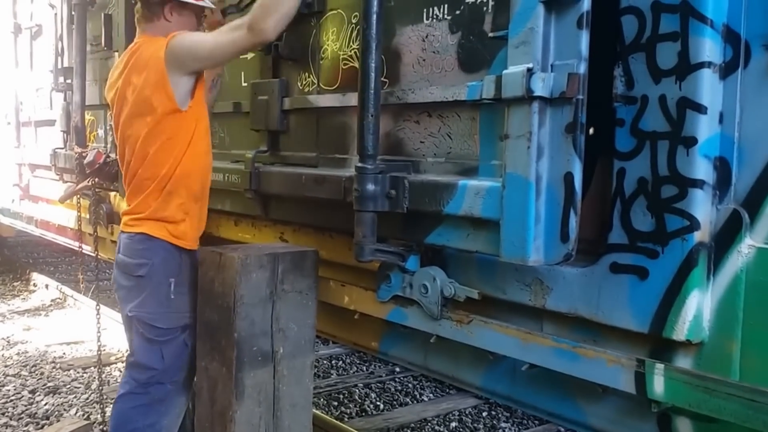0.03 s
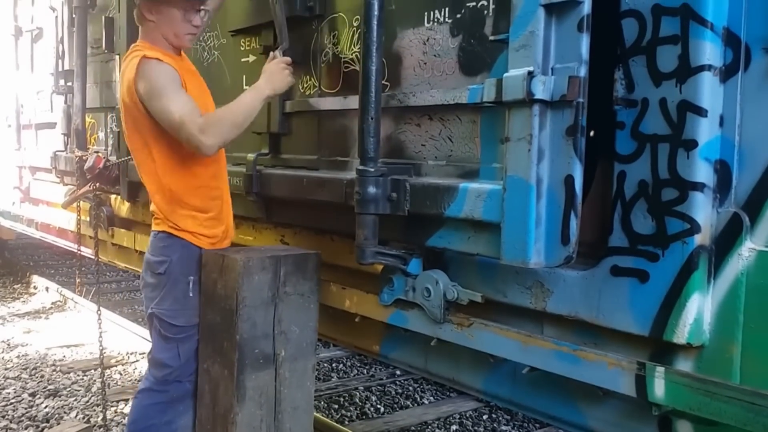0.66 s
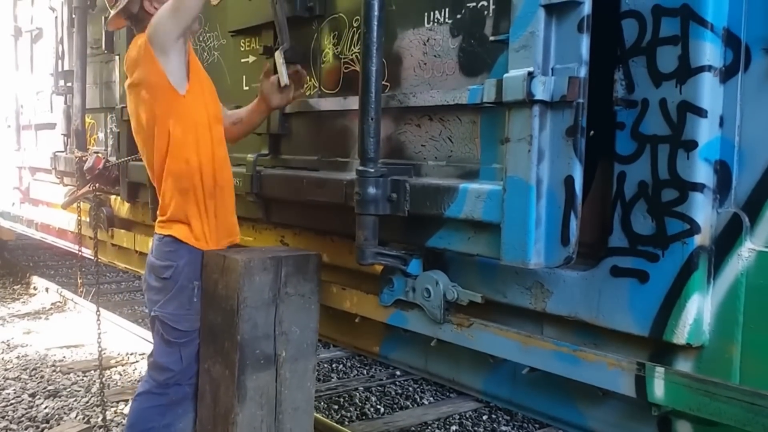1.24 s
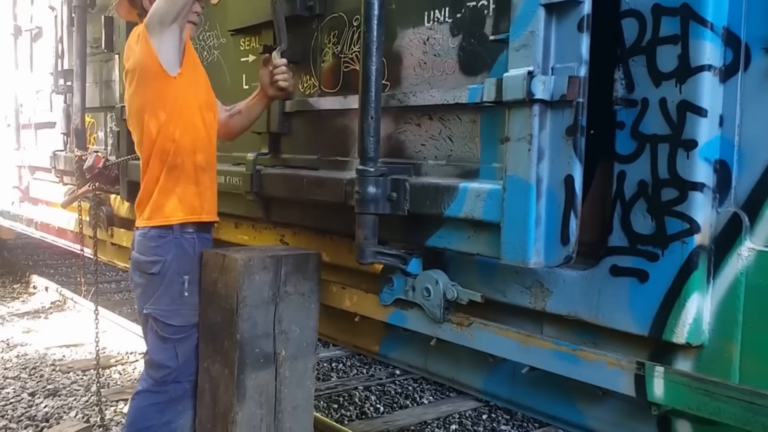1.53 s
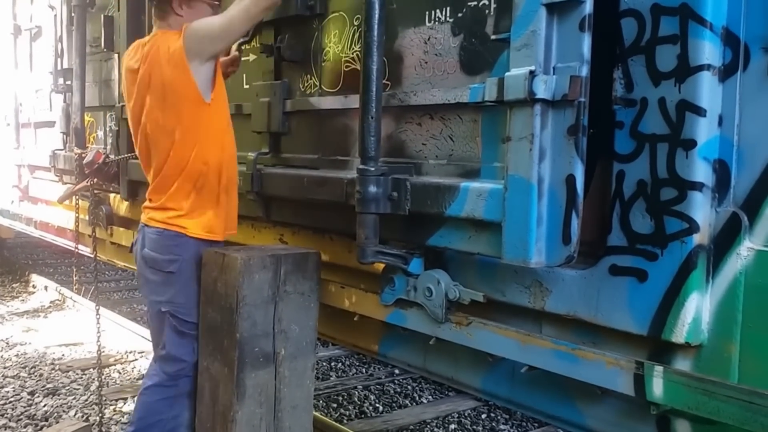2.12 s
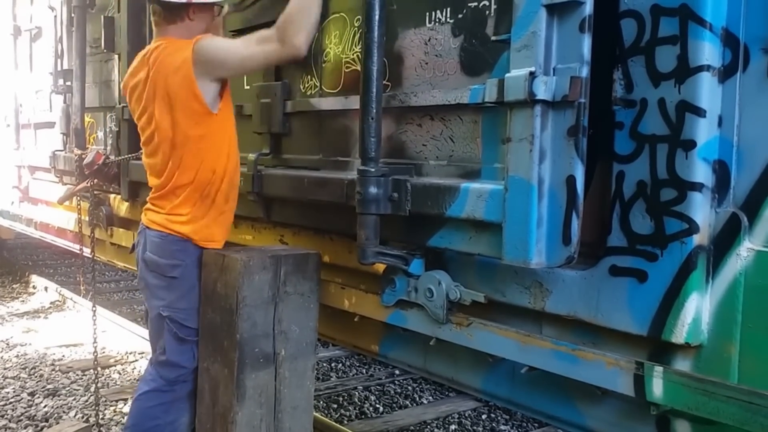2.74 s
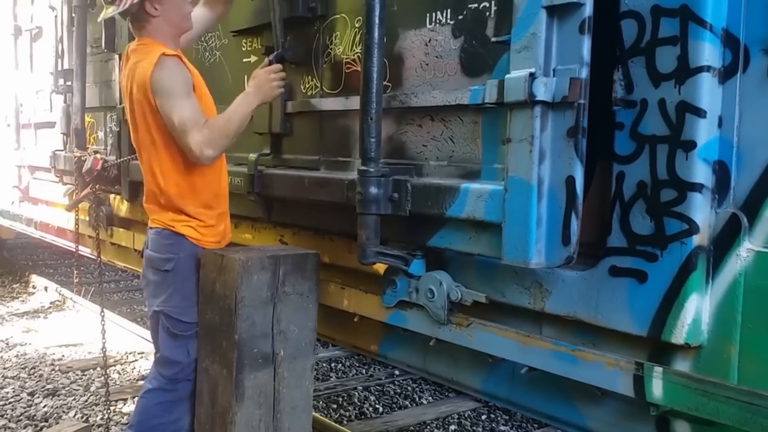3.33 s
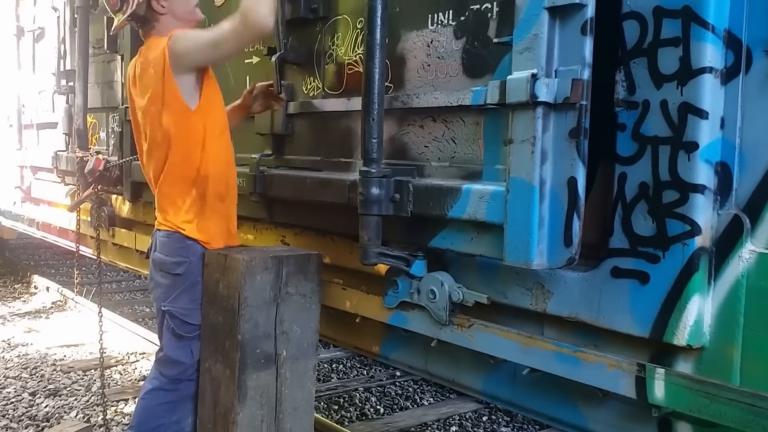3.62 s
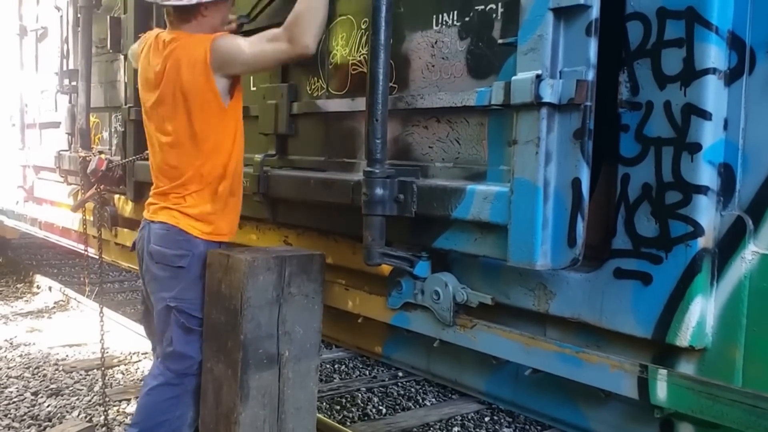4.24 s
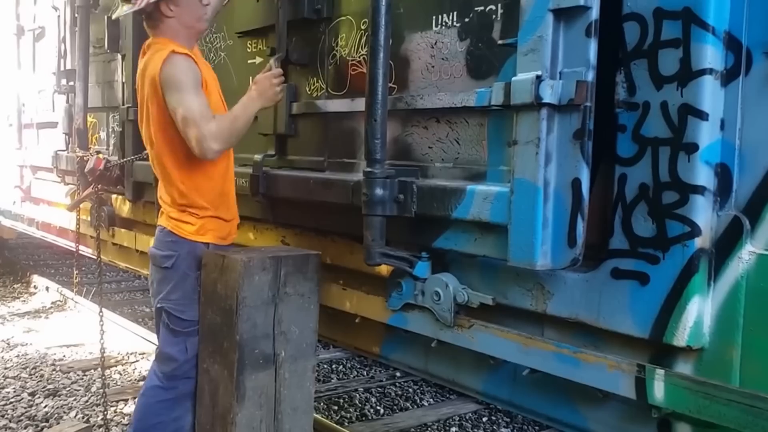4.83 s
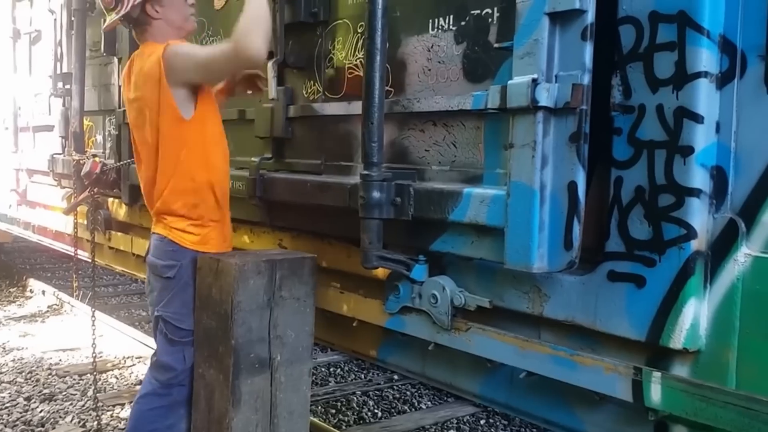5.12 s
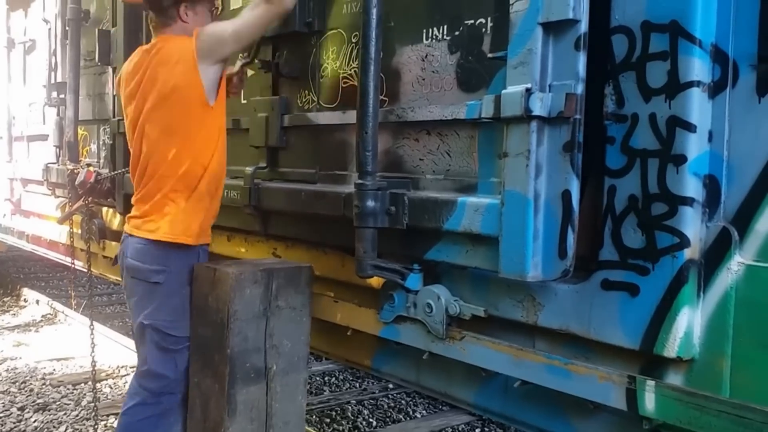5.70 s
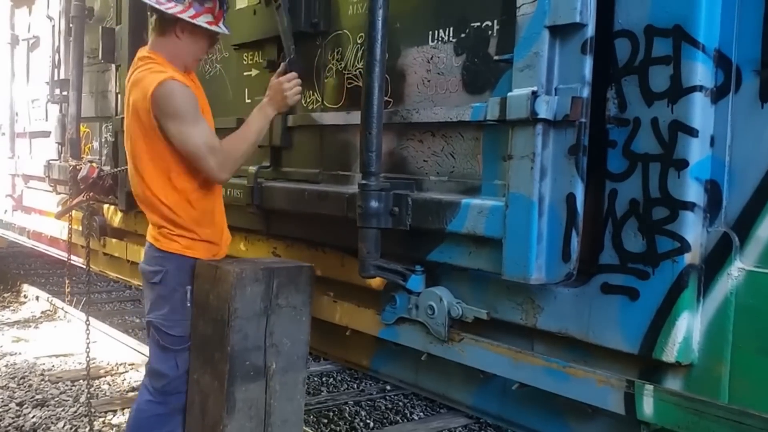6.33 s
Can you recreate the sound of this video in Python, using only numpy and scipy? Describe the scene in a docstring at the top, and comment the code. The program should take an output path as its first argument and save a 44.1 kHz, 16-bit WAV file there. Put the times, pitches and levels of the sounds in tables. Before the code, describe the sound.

A steady low rumble and a distant idling diesel fill an outdoor rail yard, with faint birds chirping on the left, mostly in the first second. A few steps away, a steel boxcar door is being cranked shut. It gives a low thump at the very start. At 1.4 seconds the ratchet lever clacks sharply, followed by rattling, booming knocks around 1.7 to 1.8 seconds. From 2.6 to 3.1 seconds comes a quick run of metal clacks and door lurches, with rollers rumbling and rust scraping, then a soft thump. Another clack lands at 3.9 seconds, and the door knocks at about 4.1 and 4.4. At 4.6 seconds a loud ringing clank sets the sheet steel booming and trails into a gritty scrape. More clacks come around 5.4 seconds, then a heavy knock at 5.6 and a lighter one that fades by about 6 seconds.

```python
"""A rail yard, outdoors, two microphones a few steps from a steel boxcar door being cranked shut.
A worker pulls a ratchet lever, which clacks and rings at the ends of its strokes. The big door
lurches, its sheet steel booms, and its rollers rumble along the track while rusty faces scrape.
Far off a diesel idles; birds call from the trees on the left, and insects sing faintly."""
import sys
import numpy as np
from scipy import signal
from scipy.fft import rfft, irfft, next_fast_len
from scipy.io import wavfile
from scipy.ndimage import uniform_filter1d

SR = 44100
rng = np.random.default_rng(int(sys.argv[2]) if len(sys.argv) > 2 else 0)


def waveform_to_disk(signal):
    """Save audio, clipped to [-1, 1], as 16-bit WAV at the path in sys.argv[1]."""
    frames = np.transpose(np.atleast_2d(signal))
    scaled = np.clip(frames, -1, 1) * 32767
    samples = np.round(scaled).astype(np.int16)
    wavfile.write(sys.argv[1], SR, samples)


N = 280476

# how alike the two microphones hear the air and the steel: freq_hz, likeness (0-1)
AIR_LIKENESS = [(100, 0.98), (300, 0.9), (600, 0.5), (1200, 0), (3000, 0)]
STEEL_LIKENESS = [(100, 1), (400, 0.92), (900, 0.54), (2000, 0.066), (5000, 0.16)]
# balance between the microphones: freq_hz, left_minus_right_db
LEFT_LEAN = [(300, -1), (600, 0.5), (1200, -2), (2400, 3.5), (4000, 3.5), (5600, 8.5), (8500, -0.5),
             (13000, 4.5)]
# shade on the right microphone for sounds from the left: freq_hz, gain_db
RIGHT_SHADE = [(2000, -3), (3400, -5), (4200, -8.5), (5500, -7), (6500, -19.5)]
# steady air of the yard: freq_hz, gain_db
AIR_SPECTRUM = [(20, -32), (29, -20), (37, -6), (55, 3.5), (95, -1), (135, -0.5), (200, -12.5),
                (450, -21.5), (800, -35), (1500, -36.5), (2300, -51), (5000, -55), (8200, -72),
                (12800, -54.5), (15500, -59.5)]
# songbird notes: start_s, length_s, start_hz, end_hz, level_db, rasp_hz, swell_db, echo_ratio
SONG_NOTES = [(0, 0.2, 2354, 1874, -65.5, 23, 2.5, 1.7), (0.522, 0.057, 5900, 4850, -66, 94, 2, 1.7),
              (0.558, 0.095, 2974, 3444, -51.5, 84, 8, 2), (0.608, 0.15, 3650, 3670, -56, 63, -7, 1.7),
              (0.626, 0.19, 3310, 3494, -62, 130, -3.5, 2.4), (0.594, 0.082, 2810, 2650, -64, 100, 3, 1.9),
              (.68, 0.12, 4020, 4130, -62, 170, 0, 2), (0.747, 0.062, 2650, 2384, -58, 19, 15, 1.5),
              (0.812, 0.1, 2400, 2080, -47.5, 21, 1.5, 1.3), (0.901, 0.14, 2183, 1850, -51.5, 100, 1.5, 3),
              (1.238, 0.19, 7000, 6350, -65.5, 210, -0.5, 2),
              (1.862, 0.13, 4430, 4180, -62.5, 290, -1.5, 1.6), (1.89, 0.09, 3760, 3590, -60.5, 210, -5, 2),
              (2.096, 0.072, 2787, 2744, -50.5, 12, 11, 0.53), (2.149, 0.16, 2900, 2883, -57, 32, -11, 1.6),
              (2.099, 0.08, 2240, 2200, -62.5, 110, -0.5, 2.2), (2.932, 0.055, 3300, 3290, -71.5, 30, 3, 1),
              (3.092, 0.13, 3660, 3530, -62.5, 140, -6, 1.3),
              (4.899, 0.22, 4430, 4195, -72, 190, -2.5, 2.5)]
# thin rising chirps of a second bird: start_s, length_s, top_hz, level_db
CHIRP_NOTES = [(.01, 0.098, 6510, -64), (.42, 0.1, 6600, -65.5), (.65, 0.12, 6400, -69),
               (1.203, 0.12, 6960, -72.5), (1.548, .13, 6770, -64.5), (1.78, 0.1, 6730, -62.5),
               (2.029, .13, 6580, -64), (2.31, .12, 6480, -64.5), (2.714, .11, 6570, -65),
               (2.977, .11, 6650, -63.5), (3.272, .12, 6680, -64.5), (3.725, 0.11, 6820, -66),
               (4.538, 0.07, 6880, -66), (4.851, 0.12, 6780, -67), (5.237, 0.1, 6700, -65.5),
               (5.95, .09, 6850, -66)]
# the door rolling a little way: start_s, length_s, level_db
DOOR_ROLLS = [(0.046, 0.23, -36), (1.371, 0.029, -26), (1.687, 0.12, -30.5), (2.65, 0.26, -25),
              (3.013, 0.3, -33), (3.784, 0.45, -31.5), (4.424, 0.049, -25.5), (4.7, .2, -34.5),
              (5.194, 0.31, -33), (5.728, 0.17, -30)]
# lever strokes dragging rusty faces over each other: peak_s, level_db, easing_db_per_s
LEVER_STROKES = [(.24, -43.5, 44), (1.45, -43.5, 29), (2.92, -42, 25), (4.06, -47.5, 36), (4.72, -35, 21.5),
                 (5.35, -47, 26), (6.13, -48, 42)]
# rollers heard through the car body, and scraping rust: freq_hz, gain_db
RUMBLE_SPECTRUM = [(25, -16.5), (50, -9.0), (75, 0.5), (140, -0.5), (200, -9), (350, -12.0),
                   (700, -49.0), (3000, -76.5)]
RUST_SPECTRUM = [(100, -13.5), (300, 14.5), (900, 10.5), (1300, -2.5), (2000, -9.0), (4000, -28.0),
                 (7000, -41.0), (10000, -56.5)]
# resonances of the steelwork, and one dip: centre_hz, width_hz, gain_db
STEEL_RESONANCES = [(290, 24, 6), (418, 16, 4), (477.5, 30, 4.5), (611.6, 20, 3.5), (694, 110, 4.5),
                    (836, 50, 2), (920, 220, 3), (1150, 39, 3), (1230, 22, 1), (1484, 90, 7.5),
                    (1688, 120, 7.5), (1850, 25, 2.5), (2350, 83, 1.5), (3050, 60, 1.5), (3620, 36, -2)]
# low panel thumps, and pings left ringing by lever clacks: start_s, pitch_hz, level_db, t60_s
SINGLE_MODE_RINGS = [(0.088, 136.5, -17, 0.15), (0.801, 106.7, -30.5, 0.42), (2.761, 4160, -59.5, 0.15),
                     (3.05, 94.6, -19.5, .2), (3.37, 71.6, -22, 0.23), (4.266, 804, -33, 0.18),
                     (4.593, 1740, -53, 0.68)]
# rusty faces groaning and hissing as they slip: start_s, length_s, centre_hz, width_hz, level_db
RUST_SLIPS = [(0.224, 0.034, 880, 260, -48.5), (0.316, 0.03, 870, 130, -51.5),
              (1.212, 0.19, 1196, 160, -56), (2.867, 0.066, 1380, 130, -49), (3.067, 0.029, 1376, 90, -46),
              (3.09, .05, 13200, 3970, -67), (5.606, 0.085, 3560, 696, -66.5),
              (6.077, 0.19, 2250, 600, -68)]
# lever and pawl clacks: seat_s, level_db, attack_s, play_db, tilt_db_per_octave, ring_factor,
# note_hz, note_db, second_note_hz, second_note_db, crack_db, bar_db
LEVER_CLACKS = [(1.4124, -25, .0002, 0.5, .5, 0.89, 1550, 8.5, 486, 1, 20, -0.5),
                (1.416, -32, .0003, -3, 3, 0.62, 1900, 7, 3200, 11.5, 11.5, 7),
                (1.716, -31.5, .001, 2.5, -1.5, .6, 800, 11.5, 1650, 7, 13, -6),
                (1.799, -34.5, .001, 1, -2, 0.48, 1160, 9.5, 1800, 8, 13, -5),
                (2.614, -25, 0.0018, -6.5, -4.5, 0.48, 725, 8.5, 466, 2.5, 9, -8),
                (2.761, -28, .0002, -8, 4, 1, 830, 8.5, 2260, 6.5, 21.5, -8.5),
                (2.806, -35.5, .001, -7, 0, .7, 830, 3, 1650, 0, 15, -10.5),
                (2.890, -39.5, .003, 0, 1.5, 1.3, 1380, 7, 1700, 5.5, 10, -12),
                (2.955, -39.5, .002, 1, -0.5, .75, 900, 11.5, 1400, 5.5, 12.5, -8.5),
                (3.004, -33.5, .0015, -2, -2, 0.42, 720, 5.5, 1200, 10.5, 16.5, -9),
                (3.071, -37.5, .0004, -4.5, 5, 1.35, 1270, 5, 2330, 3, 13, -7.5),
                (3.083, -32.5, .001, -2, 1.5, 0.71, 1380, 16, 2380, 6.5, 16, -6),
                (3.770, -37.5, 0.003, 3, -5.5, 0.57, 990, 6.5, 1600, 3, 2, -8),
                (3.851, -24.5, .0007, -1, -2.5, 1.06, 1610, 9.5, 1150, 4, 15, -4),
                (4.263, -43.5, .0005, -2.5, 4.5, 1.5, 804, 1, 3400, 2, 15, 0),
                (4.586, -28.5, .0003, -10, 4, 0.74, 1710, 4.5, 2360, 12, 17.5, -0.5),
                (4.593, -23.5, .0002, -11, 1.1, 1.4, 1760, 10, 2390, 5, 22, -7.5),
                (4.604, -28, .0005, -5, 3, 0.79, 830, 2.5, 3070, 8, 17, -6),
                (4.672, -32, .002, -3, -2, 0.8, 915, 11, 1720, 8, 9, -7),
                (5.322, -39, .0006, -4.5, -3, 0.91, 928, 2, 1600, 1, 20, -7),
                (5.407, -34.5, .0006, -3, -2, .75, 1140, 8.5, 1650, 8, 20, 0.5),
                (5.421, -25, 0.00089, 1.5, -1.4, 0.92, 1640, 7.5, 1140, 6, 19, -1.5)]
# within a clack the pawl touches, the lever seats, then it rebounds: delay_s, level_db
CLACK_CONTACTS = [(0, -15), (0.011, -1.5), (0.021, -6.5)]
SEAT_DELAY_S = CLACK_CONTACTS[1][0]
# clear modes of the lever bar: pitch_hz, level_db, t60_s
BAR_MODES = [(905, -27.5, 0.23), (1090, -24.5, 0.23), (1180, -23, .2), (1290, -16.5, 0.3),
             (1470, -23.5, 0.13), (1590, -23.5, 0.27), (1695, -25, .2), (1790, -24, 0.18), (1866, -25, .3),
             (2140, -24, 0.18), (2240, -24.5, .25), (2353, -26, .28), (2690, -22, 0.27), (3040, -20, 0.17),
             (3480, -20.5, .25)]
# tone of a blow on the lever and on the door: freq_hz, gain_db
LEVER_SPECTRUM = [(40, -6), (120, 0.5), (300, 5), (450, 6), (620, -0.5), (900, 2.5), (1300, -8),
                  (1700, -14), (2200, -15), (3300, -23), (4500, -29), (6500, -42), (8500, -67),
                  (15000, -60.5)]
DOOR_SPECTRUM = [(30, -16), (80, -2.5), (200, 6), (440, 3.5), (580, -6.5), (850, -8.5), (1200, -18),
                 (1800, -28), (2400, -32.5), (3000, -45.5), (5000, -44), (7000, -54.5), (9000, -73),
                 (15000, -68)]
# decay of the lever and of the door's sheet steel: freq_hz, t60_s
LEVER_DECAY = [(100, 0.25), (400, 0.46), (1000, 0.22), (2500, 0.24), (8000, 0.43)]
DOOR_DECAY = [(80, 3.4), (300, 1.51), (500, 2.21), (1000, 2.35), (2000, 0.92), (5000, 1.5)]
# the door lurching on its track: start_s, level_db, tilt_db_per_octave, note_hz, note_db
DOOR_LURCHES = [(1.711, -24.5, 1.1, 465, 3.5), (1.799, -27.7, .5, 444, 5), (1.842, -33, -0.5, 451, 9),
                (2.606, -24.5, 0.6, 470, 3.5), (2.700, -28.5, -7, 130, 5.5), (2.875, -30, 1, 282, 15.5),
                (3.055, -31.5, -5, 290, 11), (4.053, -27.5, 1.8, 290, 4), (4.429, -26, 0.94, 201, 10),
                (4.594, -23.5, 1.5, 192, 10.5), (5.617, -21.5, -0.8, 199, 7.5), (5.835, -32, 0.5, 250, 4)]
# loose latch hardware, rung by every lurch: centre_hz, width_hz, gain_db
LATCH_RESONANCES = [(830, 540, 2), (1460, 280, 1.5), (1900, 150, 2), (2340, 130, 7.5), (5350, 600, 8.5)]


def gain_of(db):
    """Decibels to amplitude."""
    return 10 ** (np.asarray(db) / 20)


def unit_rms(x):
    """Scales to rms 1."""
    return x / np.sqrt(np.mean(x ** 2) + 1e-20)


def curve(points, hz):
    """Reads a table on a log-frequency axis."""
    freq_hz, value = np.transpose(points)
    return np.interp(np.log(hz + 1), np.log(freq_hz + 1), value)


def add(mix, start_s, sound):
    """Adds a sound to the mix at start_s."""
    part = mix[..., max(round(start_s * SR), 0):][..., :sound.shape[-1]]
    part += sound[..., :part.shape[-1]]


def bell(hz, centre_hz, width_hz):
    """Shape of one resonance, 1 at its top."""
    return 1 / (1 + (2 * (hz - centre_hz) / width_hz) ** 2)


def resonance_db(resonances, hz):
    """The colour that a set of resonances gives to the steel."""
    return sum(db * bell(hz, centre_hz, width_hz) for centre_hz, width_hz, db in resonances)


def colour(x, db_at, size=8192):
    """Causal filter of unit power with the dB shape db_at(hz), then leaning left or right by band."""
    hz = np.abs(np.fft.fftfreq(size, 1 / SR))
    log_gain = np.log(gain_of(db_at(hz)))
    taps = np.fft.ifft(np.exp(np.conj(signal.hilbert(log_gain)))).real  # minimum phase
    taps = taps[None, :size // 2] / np.linalg.norm(taps)
    length = x.shape[1]
    lean_db = curve(LEFT_LEAN, np.fft.rfftfreq(length, 1 / SR))
    leaning = irfft(rfft(x) * gain_of(np.outer([.5, -.5], lean_db)), length)
    return signal.fftconvolve(leaning, taps, axes=1)[:, :length]


def noise_pair(likeness, size):
    """White noise at two microphones, alike in the bass and less so in the treble."""
    length = next_fast_len(size)
    left, other = rfft(rng.standard_normal((2, length)))
    same = np.clip(curve(likeness, np.fft.rfftfreq(length, 1 / SR)), 0, 1)
    right = same * left + np.sqrt(1 - same ** 2) * other
    return irfft(np.array([left, right]), length)[:, :size]


def from_left(x):
    """The right microphone hears a source on the left softer and duller."""
    shade = gain_of(curve(RIGHT_SHADE, np.fft.rfftfreq(N, 1 / SR)))
    return np.array([x[0], irfft(rfft(x[1]) * shade, N)])


def yard_air(level_db=-32):
    """Steady low rumble of the open yard, all around the microphones."""
    return gain_of(level_db) * colour(noise_pair(AIR_LIKENESS, N), lambda hz: curve(AIR_SPECTRUM, hz))


def far_diesel(firing_hz=114.66, waver_hz=1.48, level_db=-38):
    """The wavering firing note of a distant idling engine, with a weaker octave below."""
    drift, swell = (unit_rms(signal.resample(row, N)) for row in rng.standard_normal((2, 40)))
    phase = 2 * np.pi * np.cumsum(firing_hz + waver_hz * drift) / SR
    hum = unit_rms((np.sin(phase) + .5 * np.sin(phase / 2)) * (1 + 0.7 * swell))
    lean = gain_of(np.array([[.5], [-.5]]) * curve(LEFT_LEAN, firing_hz))
    return gain_of(level_db) * lean * hum


def insects(centre_hz=5440, width_hz=320, level_db=-77):
    """A thin, steady band of insect song off to the left."""
    band_db = lambda hz: 20 * np.log10(bell(hz, centre_hz, width_hz) + 1e-4)
    return gain_of(level_db) * from_left(colour(noise_pair(AIR_LIKENESS, N), band_db))


def whistle(length_s, start_hz, end_hz, level_db, rasp_hz, swell_db):
    """One bird note: a sine that slides fast, then settles, roughened by quick pitch scatter."""
    t = np.arange(int(length_s * SR)) / SR
    glide_hz = end_hz + (start_hz - end_hz) * (1 - t / length_s) ** 1.5
    scatter = unit_rms(uniform_filter1d(rng.standard_normal(SR), size=90))[:len(t)]
    phase = 2 * np.pi * np.cumsum(glide_hz + rasp_hz * scatter) / SR
    envelope = signal.windows.tukey(len(t), .5) * gain_of(swell_db * t / length_s)
    return gain_of(level_db) * unit_rms(np.sin(phase) * envelope)


def tree_echoes(x, echo_ratio, t60_s, echoes_per_s=2000):
    """Adds scattered echoes from trunks and cars, different at each microphone."""
    t = np.arange(SR) / SR
    taps = rng.standard_normal((2, SR)) * (rng.random((2, SR)) < echoes_per_s / SR)
    taps *= gain_of(-60 * t / t60_s)
    taps *= echo_ratio / np.linalg.norm(taps, axis=1, keepdims=True)
    taps[:, 0] += 1  # the direct sound
    return signal.fftconvolve(x[None], taps / np.sqrt(1 + echo_ratio ** 2), axes=1)[:, :N]


def birds(chirp_start_hz=5810):
    """A whistling songbird and a thin chirper, both in the trees to the left."""
    song, chirps = np.zeros((2, N)), np.zeros(N)
    for start_s, *note, echo_ratio in SONG_NOTES:
        add(song, start_s, tree_echoes(whistle(*note), echo_ratio, t60_s=0.53))
    for start_s, length_s, top_hz, db in CHIRP_NOTES:
        add(chirps, start_s, whistle(length_s, chirp_start_hz, top_hz, db, rasp_hz=160, swell_db=9))
    return from_left(song + tree_echoes(chirps, echo_ratio=2.2, t60_s=.55))


def rollers(rise_s=0.061, coast_db_per_s=46.5):
    """Rollers rumble through the car body: they start up, hold while pulled, then coast."""
    t = np.arange(N) / SR
    rolls = []
    for start_s, length_s, db in DOOR_ROLLS:
        coasting_s = np.maximum(t - start_s - length_s, 0)
        rolls.append(np.clip((t - start_s) / rise_s, 0, 1) * gain_of(db - coast_db_per_s * coasting_s))
    motion = np.linalg.norm(rolls, axis=0)
    return colour(noise_pair(AIR_LIKENESS, N) * motion, lambda hz: curve(RUMBLE_SPECTRUM, hz))


def rust_scrape(load_db_per_s=82, grit_per_s=140, grit_db=16):
    """Rusty faces scrape and catch as each stroke loads up quickly and eases off more slowly."""
    t = np.arange(N) / SR
    strokes = [gain_of(db - np.maximum(load_db_per_s * (peak_s - t), easing * (t - peak_s)))
               for peak_s, db, easing in LEVER_STROKES]
    force = np.linalg.norm(strokes, axis=0)
    grit = (rng.random(N) < grit_per_s / SR) * rng.standard_normal(N) * gain_of(grit_db)
    friction = unit_rms(noise_pair(STEEL_LIKENESS, N) + grit) * force
    return colour(friction, lambda hz: curve(RUST_SPECTRUM, hz) + resonance_db(STEEL_RESONANCES, hz))


def thumps_and_pings(rise_s=0.011):
    """Low panel thumps and pings left by lever clacks: each is one mode that swells and dies away."""
    out, t = np.zeros(N), np.arange(SR) / SR
    for start_s, hz, db, t60_s in SINGLE_MODE_RINGS:
        envelope = 2 * gain_of(db - 60 * t / t60_s) * (1 - np.exp(-t / rise_s))
        add(out, start_s, envelope * np.sin(2 * np.pi * hz * t))
    return out


def rust_slips():
    """Stick and slip drives one resonance for a moment."""
    out = np.zeros((2, N))
    for start_s, length_s, centre_hz, width_hz, db in RUST_SLIPS:
        size = int(length_s * SR)
        rub = noise_pair(STEEL_LIKENESS, size) * signal.windows.tukey(size, .5)
        rub = np.pad(rub, ((0, 0), (0, SR // 10)))  # room to ring out
        ring_db = lambda hz: 20 * np.log10(bell(hz, centre_hz, width_hz) ** 0.97 + 1e-4)
        add(out, start_s, gain_of(db) * colour(rub, ring_db))
    return out


def steel_ring(size, decay, ring_factor=1, hold_s=0):
    """Crowded modes as noise: once the blow has spread, each band dies away at its own speed."""
    hz, t, bands = signal.stft(noise_pair(STEEL_LIKENESS, size), SR, nperseg=256)
    fall_db = -60 * np.maximum(t - hold_s, 0) / (ring_factor * curve(decay, hz)[:, None])
    return signal.istft(bands * gain_of(fall_db), SR, nperseg=256)[1][:, :size]


def chatter(t, hits_per_s, depth, settle_s, contact_s=0.0017):
    """Loose steel parts strike several times in quick succession, sharing the energy of one blow."""
    settling = np.exp(-t / settle_s)
    hits = (rng.random(len(t)) < hits_per_s / SR) * settling
    hits[0] = 0.29
    pulses = signal.lfilter([1], [1, -np.exp(-1 / (contact_s * SR))], hits)
    envelope = 1 + depth * np.minimum(pulses, 1)
    return envelope / np.sqrt(np.average(envelope ** 2, weights=settling))


def bar_ring(t, ring_factor, uneven_db=3.5, spread_rad=0.76):
    """The bar's clear modes, woken differently by each blow and out of step at the two microphones."""
    out = np.zeros((2, len(t)))
    for hz, db, t60_s in BAR_MODES:
        strength, skew = rng.standard_normal(2)
        phase = 2 * np.pi * (hz * t + rng.random()) + spread_rad * skew * np.array([[1], [-1]])
        out += gain_of(db + uneven_db * strength - 60 * t / (ring_factor * t60_s)) * np.sin(phase)
    return out


def clack(attack_s, play_db, ring_factor, crack_db, bar_db, echo_db=-23, echo_t60_s=0.28):
    """Three hard contacts set the bar ringing; the cars around return a faint dull echo."""
    blow, t = np.zeros((2, SR)), np.arange(SR) / SR
    attack = 1 - np.exp(-t / attack_s)
    for delay_s, db in CLACK_CONTACTS:
        if delay_s != SEAT_DELAY_S:
            db += play_db  # play in the joint sets the strength of touch and rebound
        ring = steel_ring(SR // 2, LEVER_DECAY, ring_factor, hold_s=0.0037)
        rattle = chatter(t, hits_per_s=170, depth=1.4, settle_s=0.027) * attack
        add(blow, delay_s, gain_of(db) * ring * rattle[:SR // 2])
    echo = signal.lfilter(*signal.butter(1, 1300, fs=SR), noise_pair(AIR_LIKENESS, SR))
    add(blow, SEAT_DELAY_S, echo * gain_of(echo_db - 60 * t / echo_t60_s) * attack)
    add(blow, SEAT_DELAY_S, gain_of(bar_db) * bar_ring(t[:SR // 3], ring_factor) * attack[:SR // 3])
    add(blow, SEAT_DELAY_S, gain_of(crack_db) * np.ones((2, 1)))  # steel meets steel: one sharp pulse
    return blow


def lever():
    """The ratchet clacks a few steps away, each blow coloured by the steelwork and two notes of its own."""
    out = np.zeros((2, N))
    for (seat_s, db, attack_s, play_db, tilt, ring_factor,
         note_hz, note_db, second_hz, second_db, crack_db, bar_db) in LEVER_CLACKS:
        blow = clack(attack_s, play_db, ring_factor, crack_db, bar_db)
        tone_db = lambda hz: (curve(LEVER_SPECTRUM, hz) + resonance_db(STEEL_RESONANCES, hz)
                              + tilt * np.log2(np.clip(hz, 200, 3000))
                              + note_db * bell(hz, note_hz, 0.16 * note_hz)
                              + second_db * bell(hz, second_hz, 0.1 * second_hz))
        add(out, seat_s - SEAT_DELAY_S, gain_of(db) * colour(blow, tone_db))
    out[1] = np.roll(out[1], 5)  # the lever is a little nearer the left microphone
    return out


def door(shove_db=12, knock_rise_s=0.002, knock_t60_s=0.42, boom_rise_s=0.0085, boom_db=-5.5):
    """Each lurch is a sudden shove and a rattling knock that leave the big steel sheet booming."""
    out, t = np.zeros((2, N)), np.arange(2 * SR) / SR
    shove = gain_of(shove_db) * (t == 0)
    for start_s, db, tilt, note_hz, note_db in DOOR_LURCHES:
        sheet_db = lambda hz: (curve(DOOR_SPECTRUM, hz) + resonance_db(STEEL_RESONANCES, hz)
                               + tilt * np.log2(np.clip(hz, 150, 3000))
                               + note_db * bell(hz, note_hz, 0.31 * note_hz))
        with_latch_db = lambda hz: sheet_db(hz) + resonance_db(LATCH_RESONANCES, hz)
        envelope = (1 - np.exp(-t / knock_rise_s)) * gain_of(-60 * t / knock_t60_s)
        knock = noise_pair(STEEL_LIKENESS, len(t)) * envelope
        knock *= chatter(t, hits_per_s=460, depth=0.18, settle_s=0.021)
        boom = steel_ring(len(t), DOOR_DECAY) * (1 - np.exp(-t / boom_rise_s))
        add(out, start_s, gain_of(db) * colour(shove + knock, with_latch_db))
        add(out, start_s, gain_of(db + boom_db) * colour(boom, sheet_db))
    return out


def scene():
    """The yard in the distance, the door and its lever close to the microphones."""
    distant = yard_air() + far_diesel() + insects() + birds()
    return distant + rollers() + rust_scrape() + thumps_and_pings() + rust_slips() + lever() + door()


def record(dry, top_hz=15500):
    """The recorder's band limit."""
    lowpass = signal.firwin(511, top_hz, window=("kaiser", 9), fs=SR)
    return signal.oaconvolve(dry, lowpass[None], "same")


dry = scene()
out = record(dry)
waveform_to_disk(out)
```